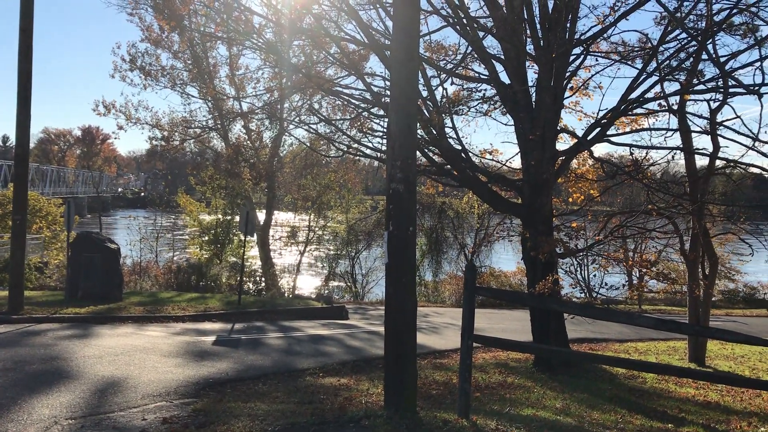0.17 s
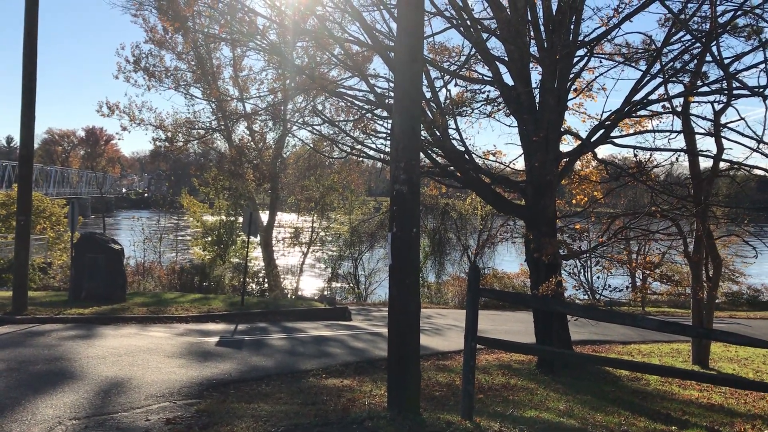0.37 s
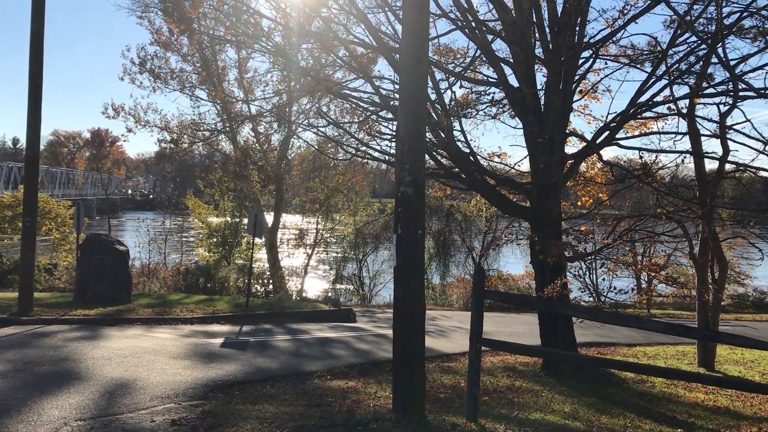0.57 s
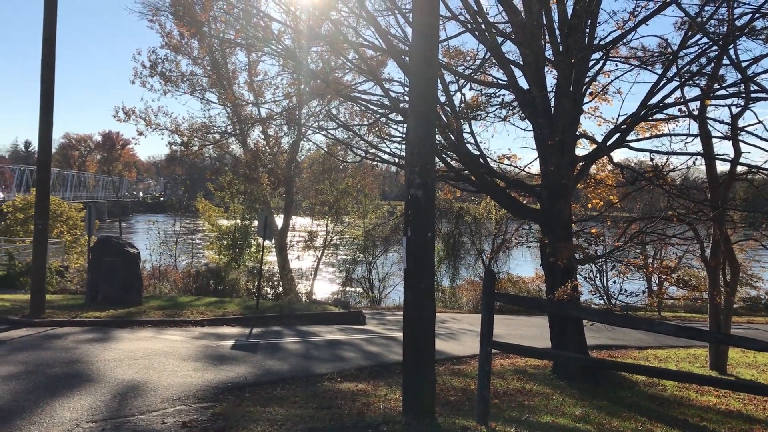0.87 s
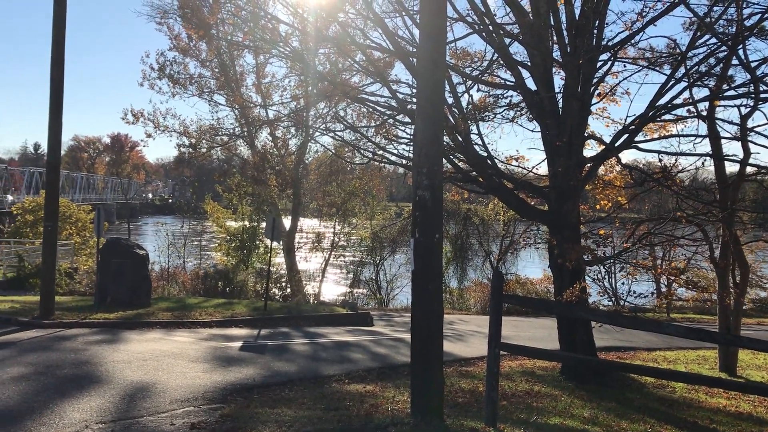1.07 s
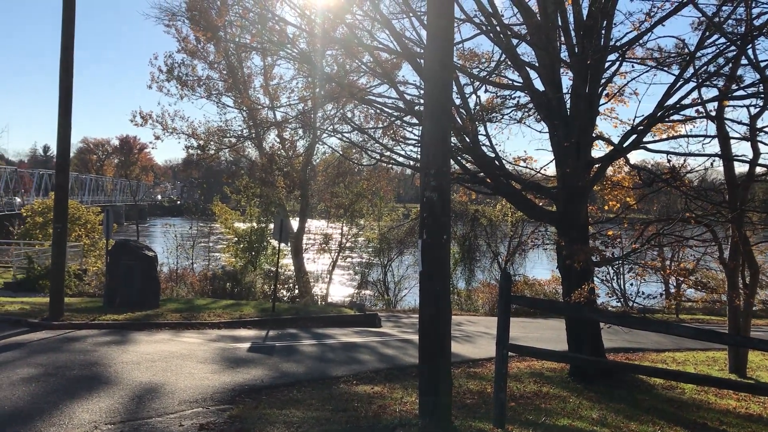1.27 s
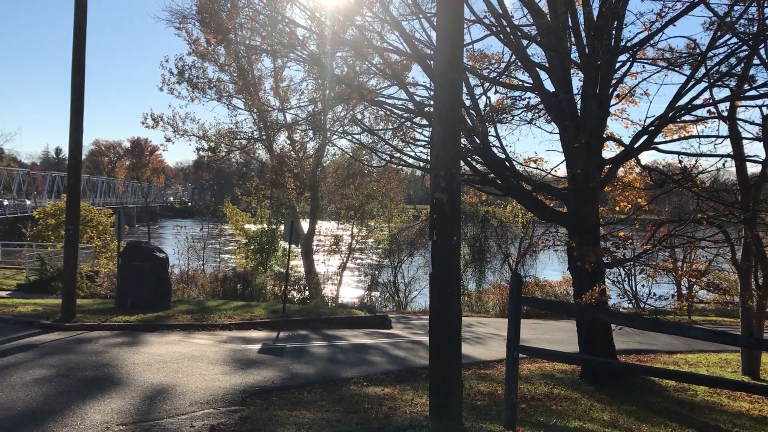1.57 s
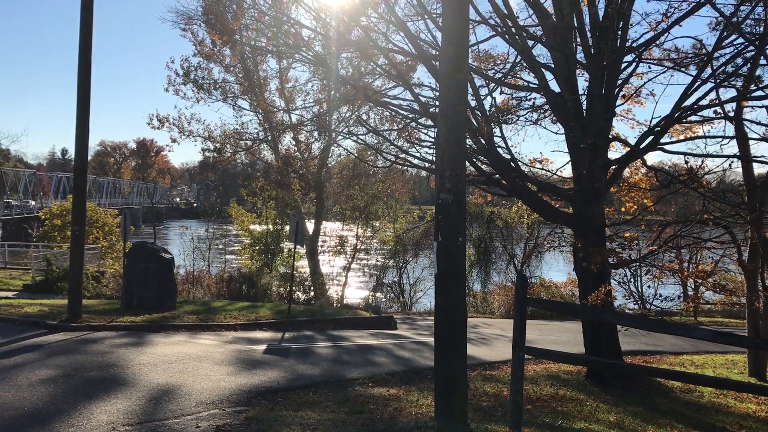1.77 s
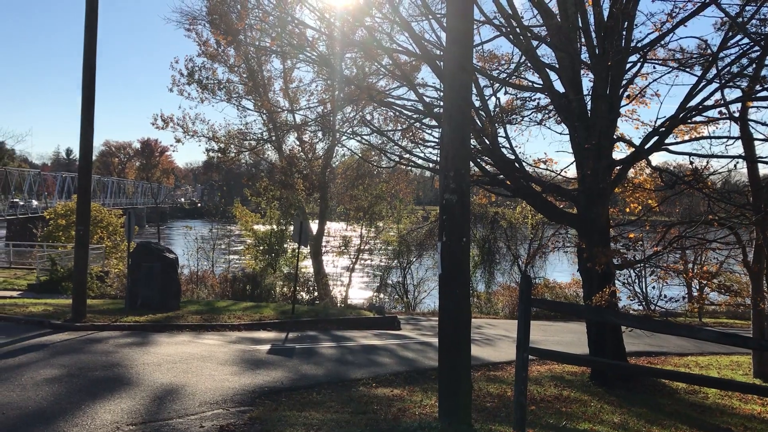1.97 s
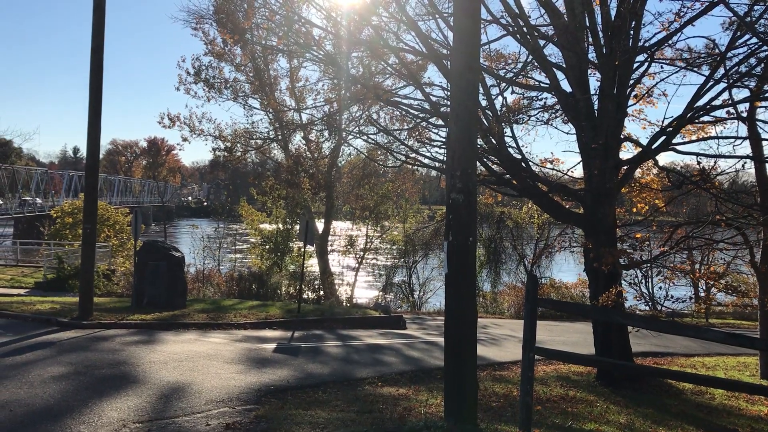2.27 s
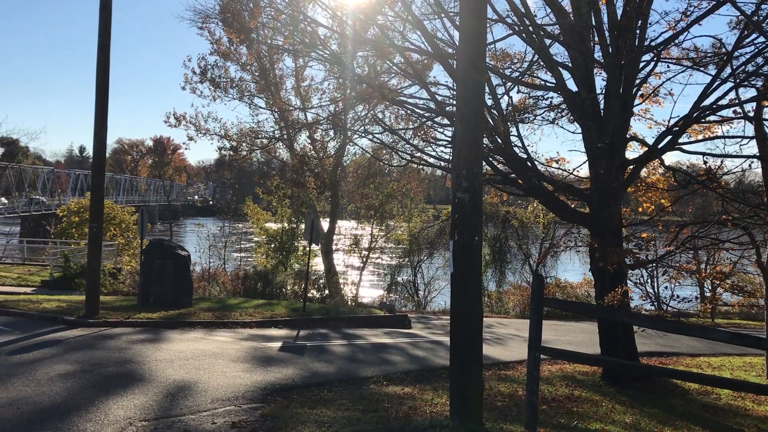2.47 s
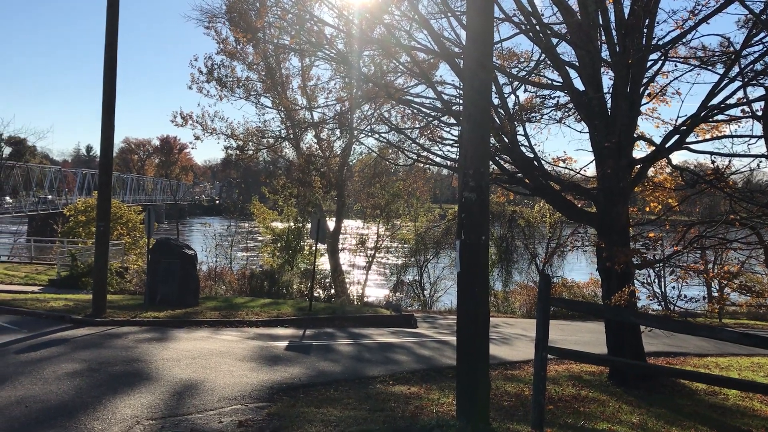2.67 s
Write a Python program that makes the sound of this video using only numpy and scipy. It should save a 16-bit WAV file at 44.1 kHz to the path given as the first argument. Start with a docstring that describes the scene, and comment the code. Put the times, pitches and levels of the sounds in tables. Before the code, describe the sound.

A car approaches with a swelling tyre whoosh while a nearby engine idles in low, uneven thumps

```python
"""Beside a road an engine idles close by throughout: each uneven firing is a low thump that drops in pitch.
Over distant traffic, a car's tyre whoosh (noise in bands) swells and brightens as it draws near.
Dry ticks, gritty crackles and a far bird's falling chirps (bent sines) are scattered all along.
Two knocks (decaying modes) come midway, each with a thud and a scuff of noise after it.
Then the car's exhaust drone, a stack of sine overtones, enters, rises in pitch and settles."""
import sys
import numpy as np
from scipy import signal
from scipy.fft import rfft, irfft, next_fast_len
from scipy.io import wavfile
from scipy.ndimage import uniform_filter1d

SR = 44100
rng = np.random.default_rng(int(sys.argv[2]) if len(sys.argv) > 2 else 0)


def persist_wave(psi):
    """Save psi, clipped to +-1, as 16-bit WAV."""
    counts = np.round(np.clip(psi, -1, 1) * 32767).astype(np.int16)
    wavfile.write(sys.argv[1], SR, np.atleast_2d(counts).T)


def volts_from_db(level):
    """Convert decibel levels to linear amplitude ratios."""
    exponent = np.asarray(level, float) / 20
    return 10 ** exponent


N = 123921
TOP_HZ = 15750  # upper limit of the sound


def col(table, k, t):
    """Column k of a breakpoint curve, read at times t."""
    points = np.array(table, float)
    return np.interp(t, points[:, 0], points[:, k])


def colour(points, hz):
    """Spectrum level in dB at hz, interpolated along log frequency."""
    curve = np.array(points, float)
    return np.interp(np.log(hz), np.log(curve[:, 0]), curve[:, 1])


def unit(x):
    """Scale to rms 1."""
    return x / np.sqrt(np.mean(x ** 2))


def walk(rate):
    """Random levels held 1 / rate s and smoothed twice, at rms 1."""
    hold = int(SR / rate)
    steps = np.repeat(rng.standard_normal(N // hold + 1), hold)
    return unit(uniform_filter1d(uniform_filter1d(steps, hold), hold)[:N])


def bands(points, lo_hz, hi_hz, level_db, flicker_db, rate):
    """Coloured noise in third-octave bands, each with its own level curve and random flicker."""
    f = np.maximum(np.arange(N // 2 + 1) * SR / N, 1)
    spec = rfft(rng.standard_normal(N)) * volts_from_db(colour(points, f)) * (f > lo_hz) * (f < hi_hz)
    spec = spec / np.sqrt(2 * np.sum(np.abs(spec) ** 2)) * N  # rms 1 in all
    out = np.zeros(N)
    for hz in 20 * 2 ** (np.arange(30) / 3):
        # neighbouring bands crossfade and sum to one
        share = np.cos(np.pi / 2 * np.clip(3 * np.log2(f / hz), -1, 1)) ** 2
        out += irfft(spec * share, N) * volts_from_db(level_db(hz) + flicker_db * walk(rate))
    return out


def add(out, start_s, sound):
    """Mix a sound in at a time."""
    i = max(int(start_s * SR), 0)
    out[i:i + len(sound)] += sound[:max(N - i, 0)]


def decay(t, t60):
    """Exponential decay that falls 60 dB in t60 seconds."""
    return np.exp(-np.log(1000) * t / t60)


def ring(t, hz, t60, rise_s):
    """One decaying mode with a soft start."""
    return np.sin(2 * np.pi * hz * t) * decay(t, t60) * (1 - np.exp(-t / rise_s))


def burst(out, s, db, hz, width, t60, length_s):
    """A short decaying puff of noise in a band of hz * (1 +- width), scaled to its peak level."""
    noise = rng.standard_normal(int(length_s * SR))
    sos = signal.butter(3, [hz * (1 - width), min(hz * (1 + width), TOP_HZ)], "band", fs=SR, output="sos")
    puff = signal.sosfilt(sos, noise * decay(np.arange(len(noise)) / SR, t60))
    add(out, s, volts_from_db(db) * puff / np.abs(puff).max())


def idle():
    """Each firing is a falling thump that returns along the pipe, with pipe modes that vary each time."""
    # firings: (time before the lag [s], level before the gain [dB], ring length [s])
    firings = [(0.005, -21.5, 0.04), (0.078, -29.5, 0.014), (0.146, -21, 0.054), (0.225, -22, 0.049),
               (0.285, -21, 0.028), (0.362, -20.5, 0.039), (0.431, -30, 0.024), (0.499, -21.5, 0.025),
               (0.572, -23, 0.054), (0.644, -21, 0.054), (0.716, -23.5, 0.027), (0.792, -21.5, 0.04),
               (0.864, -20, 0.032), (0.935, -22.5, 0.021), (1.009, -23.5, 0.04), (1.086, -20, 0.04),
               (1.16, -18, 0.04), (1.226, -31, 0.055), (1.294, -22.5, 0.037), (1.365, -21.5, 0.045),
               (1.437, -22.5, 0.032), (1.511, -19.5, 0.032), (1.585, -23.5, 0.027), (1.657, -22, 0.064),
               (1.738, -18, 0.052), (1.808, -22, 0.026), (1.873, -21, 0.029), (1.945, -41, 0.018),
               (2.021, -26.5, 0.042), (2.093, -22.5, 0.038), (2.167, -25.5, 0.029), (2.241, -29.5, 0.032),
               (2.319, -26.5, 0.04), (2.389, -44, 0.048), (2.457, -35, 0.11), (2.531, -24, 0.037),
               (2.599, -34, 0.093), (2.688, -46, 0.044), (2.759, -28, 0.039)]
    # other modes of the pipe: (mean frequency [Hz], mean level against the thump [dB], t60 [s])
    pipe_modes = [(60.1, -15.5, 0.47), (162, -20, 0.06), (199.6, -24.5, 0.23), (243.3, -20.5, 0.12),
                  (294.8, -13, 0.097), (361.2, -19.5, 0.19)]
    gain_db, lag_s, rise_s = 1, 0.00446, 0.0011
    pipe_hz, drop_hz, drop_s = 74, 190, 0.004  # pitch settles on about pipe_hz from drop_hz above it
    return_s, return_db, return_length_s = 0.036, -11, 0.0093  # the pulse comes back along the pipe

    out, t = np.zeros(N), np.arange(SR // 5) / SR
    for s, db, length in firings:
        level_chance = rng.standard_normal(len(pipe_modes))
        pitch_chance = rng.standard_normal(len(pipe_modes))
        steady_turns = pipe_hz * (1 + 0.039 * rng.standard_normal()) * t
        turns = steady_turns + drop_hz * drop_s * (1 - np.exp(-t / drop_s))
        pulse = -np.sin(2 * np.pi * turns) * (1 - np.exp(-t / rise_s))

        thump = pulse * np.exp(-(t / length) ** 3)  # the cube ends the ring abruptly
        for (hz, mode_db, t60), louder, higher in zip(pipe_modes, level_chance, pitch_chance):
            thump += volts_from_db(mode_db + 2.55 * louder) * ring(t, hz * (1 + 0.023 * higher), t60, 0.0036)
        add(out, s + lag_s, volts_from_db(db + gain_db) * thump)

        # the return is louder when the first mode is
        echo = pulse * np.exp(-(t / return_length_s) ** 2)
        add(out, s + lag_s + return_s, volts_from_db(db + gain_db + return_db + 2 * level_chance[0]) * echo)
    return out


def exhaust_drone(t):
    """The passing car's exhaust: overtones locked to one gliding pitch, each wavering in level."""
    # pitch: (time [s], frequency [Hz])
    drone_pitch = [(1.7, 71.4), (1.765, 78.27), (1.85, 92), (1.93, 96.1), (2.0, 94.4), (2.1, 88.4),
                   (2.2, 82.25), (2.32, 78.6), (2.42, 76.8), (2.6, 77.14), (2.73, 76.55), (2.81, 73.3)]
    # overtones: (multiple of the pitch, mean level [dB])
    drone_orders = [(1, 0.5), (1.5, -50), (2, -32), (3, -40), (4, -48)]
    # loudness before the overtone levels: (time [s], level [dB rms])
    drone_level = [(1.7, -32), (1.8, -32), (1.9, -29.5), (2.0, -34), (2.1, -27.5), (2.2, -27.5),
                   (2.3, -23.5), (2.4, -26), (2.5, -20), (2.6, -26.5), (2.7, -26), (2.81, -21.5)]
    start_s, fade_s = 1.69, 0.049

    turns = np.cumsum(col(drone_pitch, 1, t)) / SR
    drone = np.zeros(N)
    for multiple, db in drone_orders:
        drone += volts_from_db(db + 1.2 * walk(12.2)) * np.sin(2 * np.pi * multiple * turns)
    fade = np.clip((t - start_s) / fade_s, 0, 1)
    return np.sqrt(2) * fade * volts_from_db(col(drone_level, 1, t)) * drone  # sqrt(2): sine peak from rms


def tyre_whoosh(t):
    """Tyre noise of the nearing car: coloured noise whose treble swells more than its roar."""
    # swell, of which only the change about each mean is used:
    # (time [s], tyre roar [dB], low treble [dB], high treble [dB], top [dB])
    whoosh_levels = [(0.0, -48.5, -57, -70.5, -78), (0.48, -48, -56, -69, -79), (0.86, -47, -52, -69, -77),
                     (1.06, -45.5, -51.5, -66.5, -78), (1.53, -48.5, -51, -67, -76),
                     (1.78, -47.5, -51, -64.5, -73), (2.39, -48.5, -48.5, -60.5, -69),
                     (2.57, -47.5, -47.5, -60, -64), (2.81, -47.5, -50, -61.5, -67)]
    # centres of those four ranges: (frequency [Hz])
    split_hz = [900, 2800, 6500, 12000]
    # relative spectrum: (frequency [Hz], density [dB per Hz])
    whoosh_colour = [(220, -30), (380, -2), (411, -5), (472, -7.5), (518, -4), (569, -5), (675, -6),
                     (730, -8), (813, -5), (893, -6.5), (1090, -6.5), (1560, -12.5), (2370, -17.5),
                     (2730, -19), (5000, -28.5), (5940, -29.5), (8890, -36), (12500, -41), (15600, -46.5)]

    curves = [col(whoosh_levels, k, t) for k in range(1, len(whoosh_levels[0]))]
    swell = [curve - curve.mean() for curve in curves]
    gust = 0.5 * walk(8.16)  # dB, common to all bands

    def level(hz):
        """Swell at hz, blended between the neighbouring ranges."""
        weights = [np.interp(np.log(hz), np.log(split_hz), one) for one in np.eye(len(swell))]
        return gust + sum(w * s for w, s in zip(weights, swell))

    return volts_from_db(-46.5) * bands(whoosh_colour, 380, TOP_HZ, level, flicker_db=1.0, rate=14)


def knocks():
    """Short knocks: a noise crack, a ring that sweeps quickly from treble down, then a slower low thud."""
    # knocks: (time [s], level of the modes before trim [dB], thud [dB], thud pitch [Hz],
    #          crack noise before its filter [dB], crack top [Hz])
    knock_rows = [(1.153, -24, -21, 124, -40.5, 6800), (1.641, -23, -19.5, 105, -38, 5300)]
    # modes: (frequency [Hz], relative level [dB], t60 [s])
    knock_modes = [(291, 7, 0.014), (647, -6, 0.034), (950, -12, 0.026), (1417, -6.5, 0.011),
                   (2500, -13, 0.013), (3230, -13, 0.0059), (5840, -33, .008)]
    late_s = 0.00372  # the lowest mode speaks this late, higher ones sooner
    thud_lag_s, thud_rise_s, thud_t60_s = 0.0131, 0.0047, 0.12

    out, t = np.zeros(N), np.arange(SR // 5) / SR
    for s, db, thud_db, thud_hz, crack_db, top_hz in knock_rows:
        crack = rng.standard_normal(len(t)) * decay(t, 0.012)
        sos = signal.butter(4, [1800, top_hz], "band", fs=SR, output="sos")
        add(out, s, volts_from_db(crack_db) * signal.sosfilt(sos, crack))
        for hz, mode_db, t60 in knock_modes:
            mode = ring(t, hz, t60, 0.27 / hz)
            add(out, s + late_s * knock_modes[0][0] / hz, volts_from_db(db + mode_db + 4) * mode)  # 4 dB trim
        add(out, s + thud_lag_s, volts_from_db(thud_db) * ring(t, thud_hz, thud_t60_s, thud_rise_s))
    return out


def scuffs(time):
    """A scuff after each knock: roughened, tilted noise with raspy resonances under a bell envelope."""
    # scuffs: (centre [s], rise width [s], tail width [s], level at the centre [dB rms],
    #          tilt [dB per octave], rasp [dB])
    scuff_rows = [(1.19, .009, .016, -44.5, -7, 5), (1.682, .009, .011, -50, -2, 5)]
    # raspy resonances: (frequency [Hz], width [Hz])
    rasp_peaks = [(2350, 450), (4100, 700)]
    low_hz, grit_db = 1300, 1.8  # bass roll-off; spread of the fast level flicker

    out = np.zeros(N)
    f = np.maximum(np.arange(N // 2 + 1) * SR / N, 1)
    for s, width, tail, db, tilt_db, rasp_db in scuff_rows:
        grit = rng.standard_normal(N) * volts_from_db(grit_db * walk(370))
        rasp = sum(rasp_db * np.exp(-((f - hz) / w) ** 2) for hz, w in rasp_peaks)
        shape = volts_from_db(tilt_db * np.log2(f / 4000) + rasp) / (1 + (low_hz / f) ** 2)
        grit = irfft(rfft(grit) * shape, N)
        envelope = np.exp(-0.5 * ((time - s) / np.where(time < s, width, tail)) ** 2)
        out += volts_from_db(db) * unit(grit) * envelope
    return out


def ticks_and_grit():
    """Dry ticks, dull crackles of grit under tyres, and fainter grit strewn at random."""
    # dry ticks: (time [s], peak level [dB], band centre [Hz])
    tick_rows = [(.998, -55, 9000), (1.14, -56, 12000), (1.31, -53, 8000), (1.368, -54, 7500),
                 (1.385, -42, 1400), (1.44, -58, 14000), (1.545, -58, 13000), (1.907, -52, 12000),
                 (2.185, -55, 13500), (2.66, -53, 11000)]
    # dull crackles: (time [s], peak level [dB], band centre [Hz])
    crackle_rows = [(.197, -36, 750), (.215, -34, 750), (.248, -34, 900), (.485, -37, 900),
                    (.618, -39, 1600), (.677, -34, 700), (.905, -37, 1200), (.945, -36, 800),
                    (1.083, -33, 650), (1.312, -43, 2500), (1.501, -34, 780), (1.565, -34, 700),
                    (1.74, -43, 2500)]
    crackle_width, crackle_t60_s = 0.45, 0.03
    grit_per_s, grit_db, spread_db = 60, -51, 2

    out = np.zeros(N)
    for s, db, hz in tick_rows:
        burst(out, s, db, hz, 0.4, 0.0096, 0.05)
    for s, db, hz in crackle_rows:
        burst(out, s, db, hz, crackle_width, crackle_t60_s, 0.05)
    times = np.cumsum(2 * rng.random(400) / grit_per_s)  # grains beyond the end are not heard
    for s, size, pitch in zip(times, rng.random(400), rng.random(400)):
        level_db = grit_db + spread_db * 2 * size
        burst(out, s, level_db, 500 * 4 ** pitch, crackle_width, crackle_t60_s, 0.025)
    return out


def bird():
    """A far bird: brief sines that fall in pitch while wavering in pitch and level."""
    # chirps: (centre [s], length [s], mid pitch before waver [Hz], level before flutter [dB])
    chirp_rows = [(.148, .012, 5900, -66), (.274, .01, 6300, -64), (.42, .035, 5900, -66),
                  (.645, .025, 5900, -65), (.91, .02, 5000, -64), (1.06, .012, 5840, -65),
                  (1.232, .015, 11800, -69), (1.523, .012, 5800, -63), (1.56, .012, 5950, -65),
                  (1.995, .022, 5800, -57), (2.33, .025, 5850, -60)]
    fall_hz_per_s = 2100

    out = np.zeros(N)
    waver = np.cumsum(170 * walk(300)) / SR  # turns, from a 170 Hz rms pitch waver
    flutter = volts_from_db(1.2 * walk(200))
    for k, (s, length, hz, db) in enumerate(chirp_rows):
        u = np.arange(-2 * length, 2 * length, 1 / SR)
        first = k * N // len(chirp_rows)
        part = slice(first, first + len(u))  # each chirp takes its own stretch of waver
        turns = hz * u - fall_hz_per_s * u ** 2 / 2 + waver[part]
        envelope = flutter[part] * np.exp(-(2 * u / length) ** 2)
        add(out, s + u[0], volts_from_db(db) * envelope * np.sin(2 * np.pi * turns))
    return out


def distant_traffic():
    """Low rumble: coloured noise whose bands drift slowly in level."""
    # relative spectrum: (frequency [Hz], density [dB per Hz])
    rumble_colour = [(13, -31), (22, -19), (54, 2.5), (86, -0.5), (279, -11.5), (480, -30.5), (620, -59),
                     (1060, -120)]
    return volts_from_db(-33) * bands(rumble_colour, 22, 480, lambda hz: 0, flicker_db=1.94, rate=5.33)


def scene():
    """All sources, heard by one microphone."""
    t = np.arange(N) / SR
    near = idle() + exhaust_drone(t) + tyre_whoosh(t) + knocks() + scuffs(t)
    far = ticks_and_grit() + bird() + distant_traffic()
    return (near + far)[None]


def band_limit(x):
    """A steep low-pass at the top of the band."""
    return signal.sosfilt(signal.butter(12, 15700, fs=SR, output="sos"), x)


def record(dry):
    """The microphone has a narrow dip in the treble; the phone cuts the top."""
    dip_hz, dip_width_hz, dip_db = 10430, 400, -3
    size, lead = next_fast_len(N + SR), SR // 4
    f = np.arange(size // 2 + 1) * SR / size
    dip = volts_from_db(dip_db * np.exp(-((f - dip_hz) / dip_width_hz) ** 2))
    top_cut = np.clip((TOP_HZ - f) / 100, 0, 1)
    # mirrored ends keep the filter from wrapping round
    padded = np.pad(dry, [(0, 0), (lead, size - N - lead)], mode="reflect")
    mix = irfft(rfft(padded) * dip * top_cut, size)[:, lead:lead + N]
    return band_limit(mix)


dry = scene()
out = record(dry)
persist_wave(out)
```